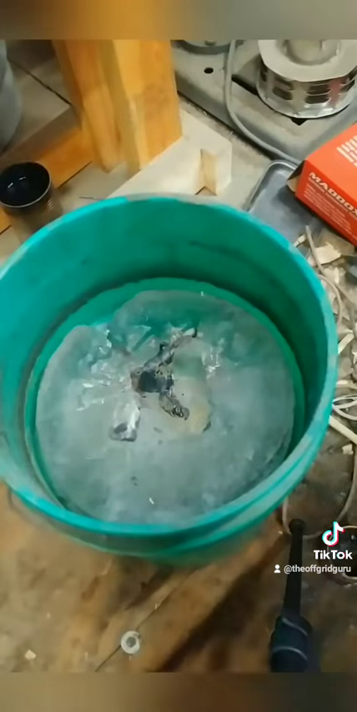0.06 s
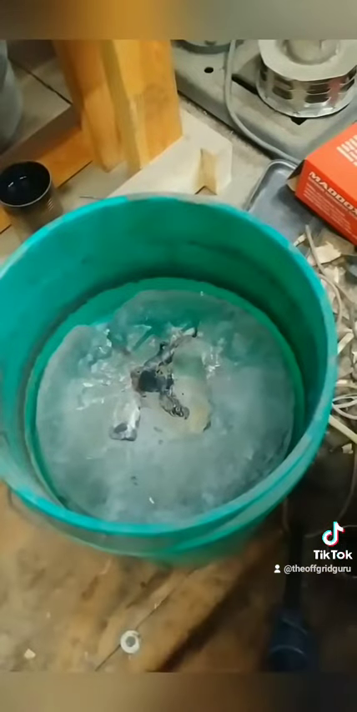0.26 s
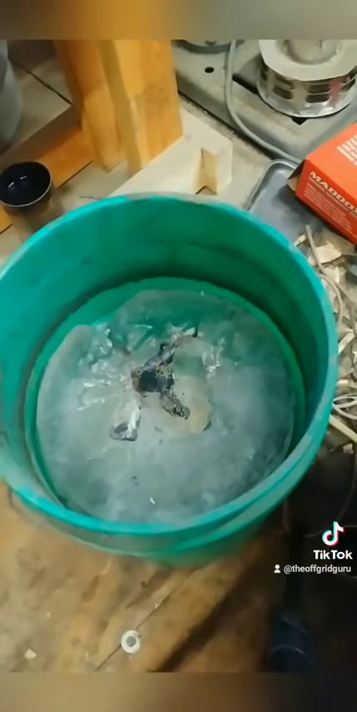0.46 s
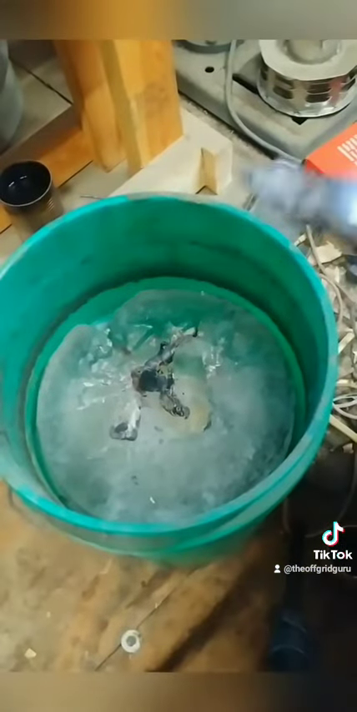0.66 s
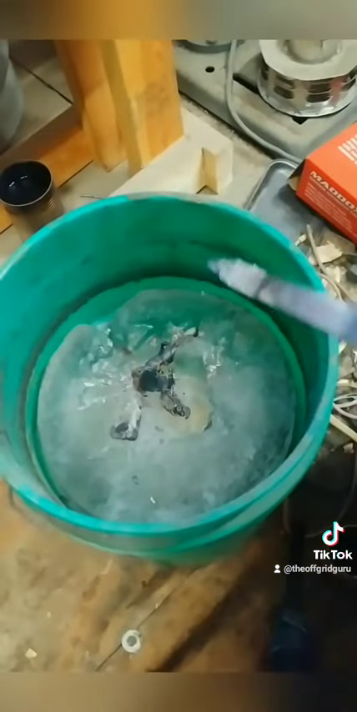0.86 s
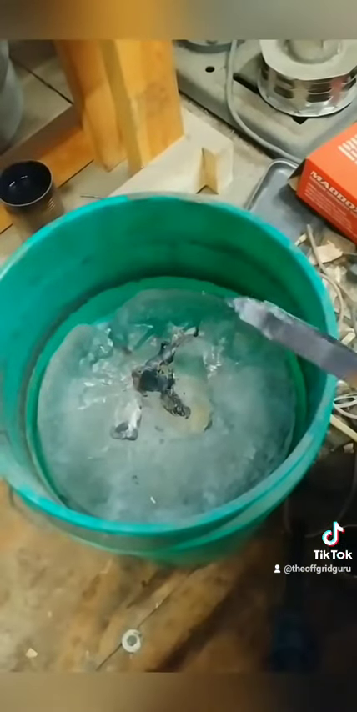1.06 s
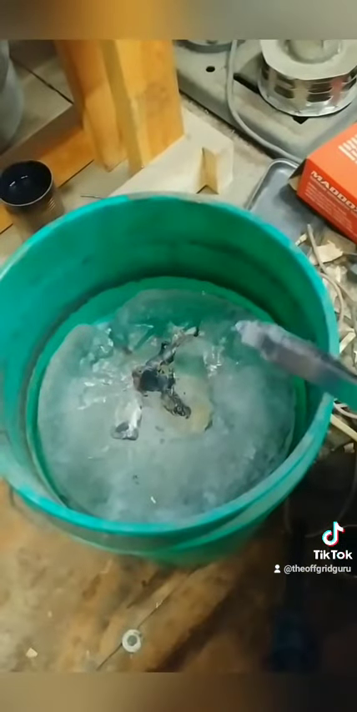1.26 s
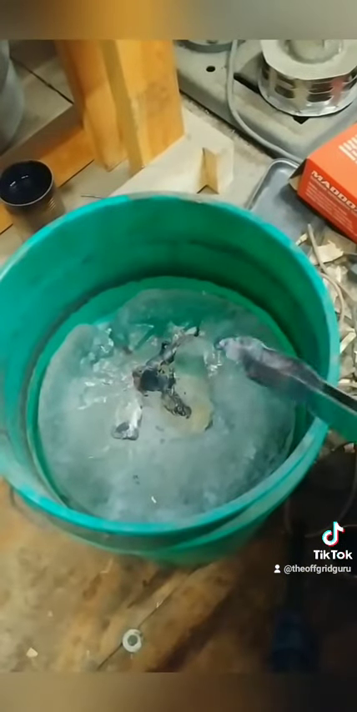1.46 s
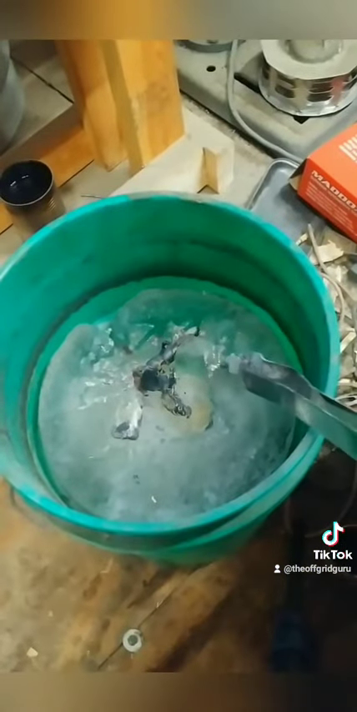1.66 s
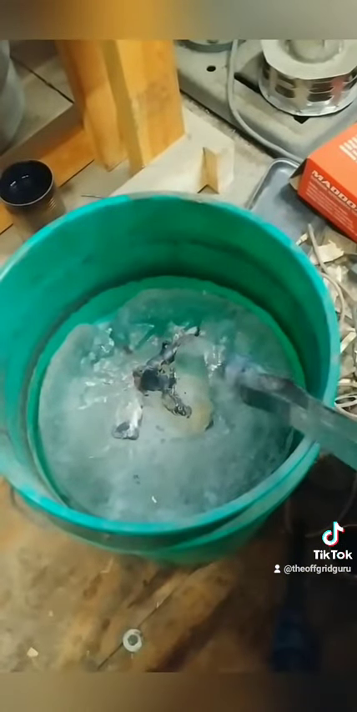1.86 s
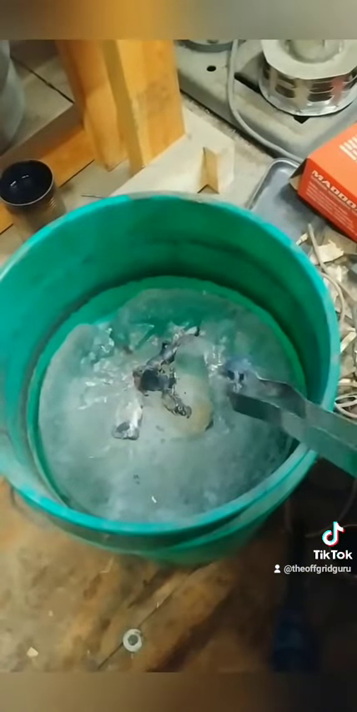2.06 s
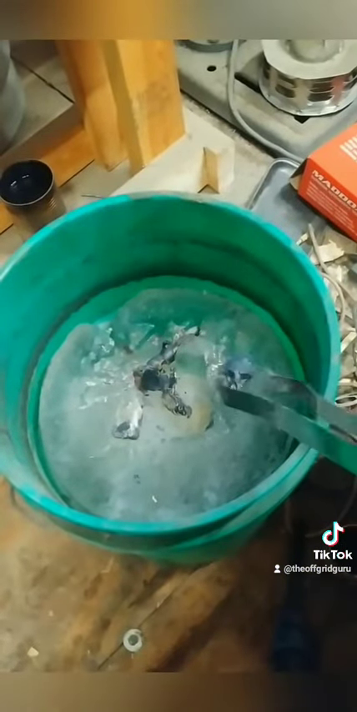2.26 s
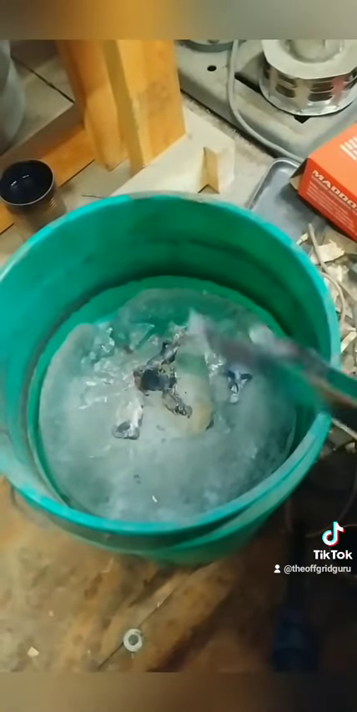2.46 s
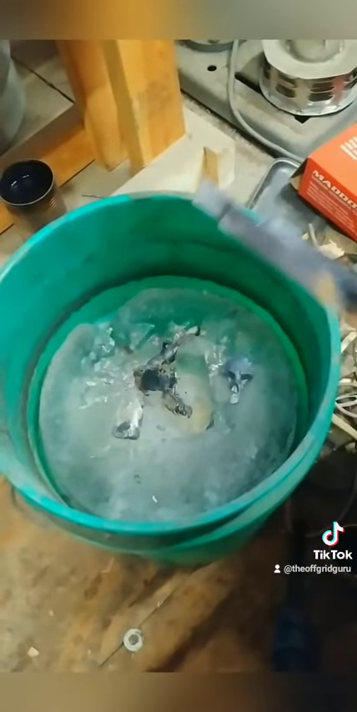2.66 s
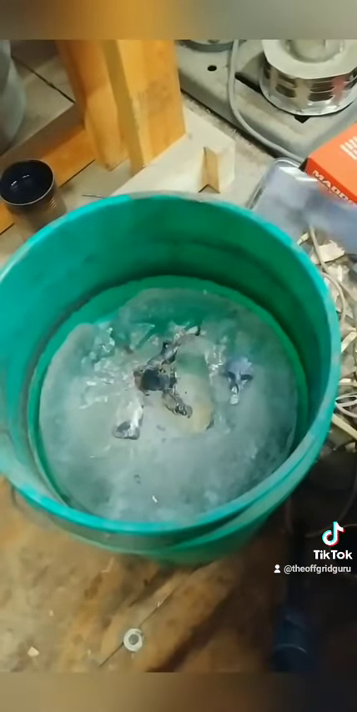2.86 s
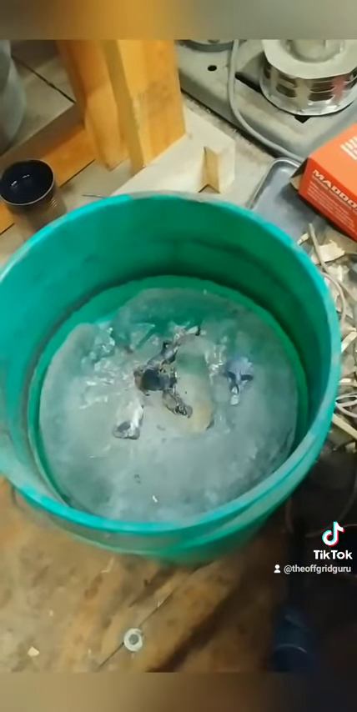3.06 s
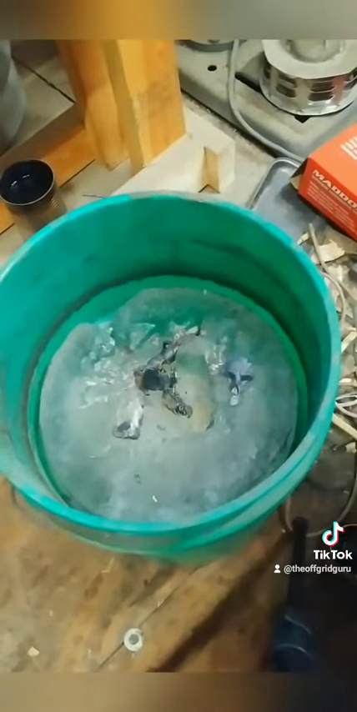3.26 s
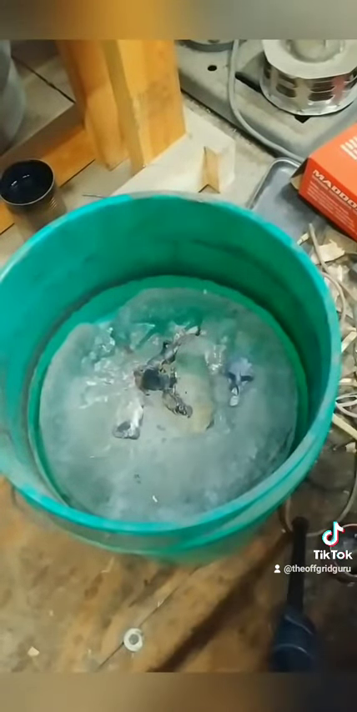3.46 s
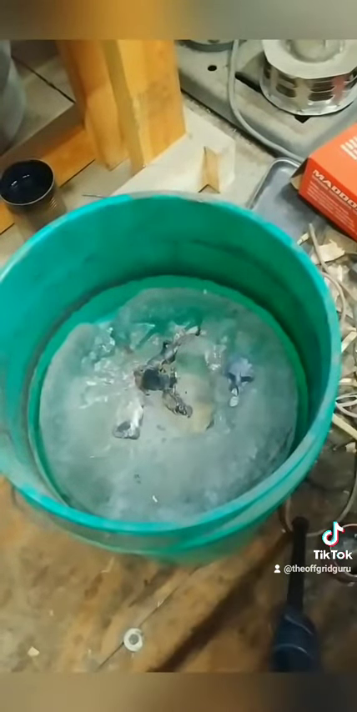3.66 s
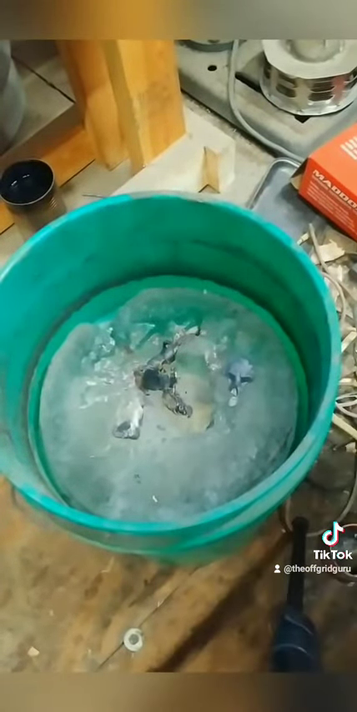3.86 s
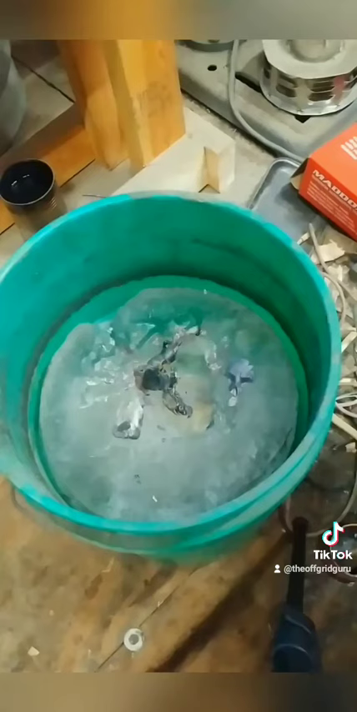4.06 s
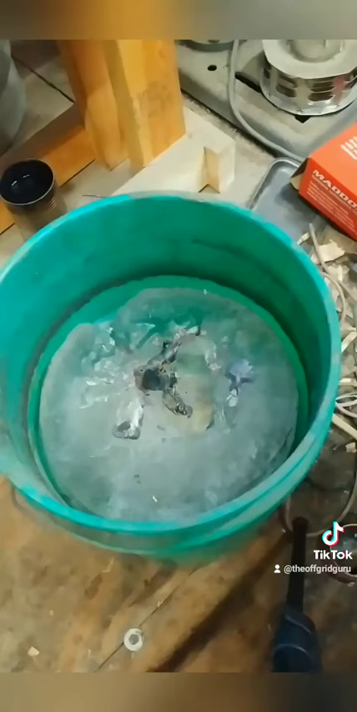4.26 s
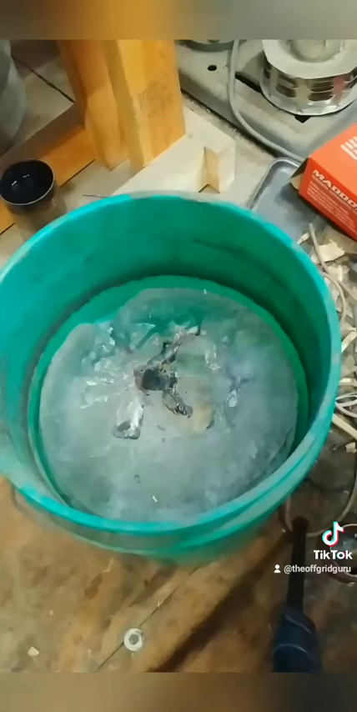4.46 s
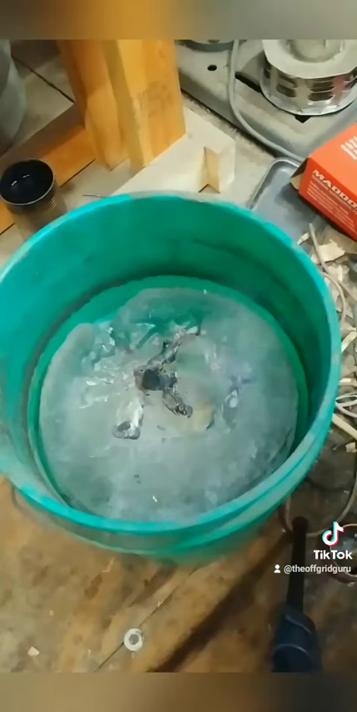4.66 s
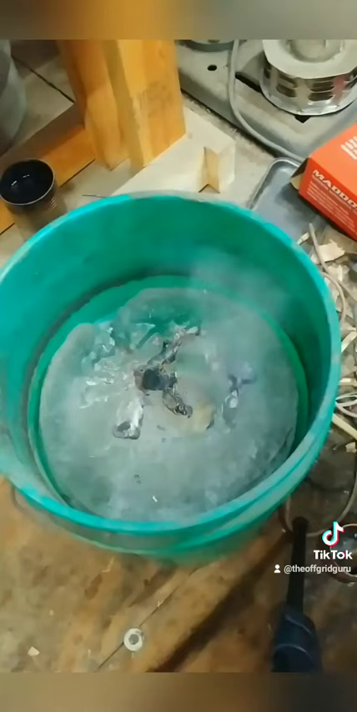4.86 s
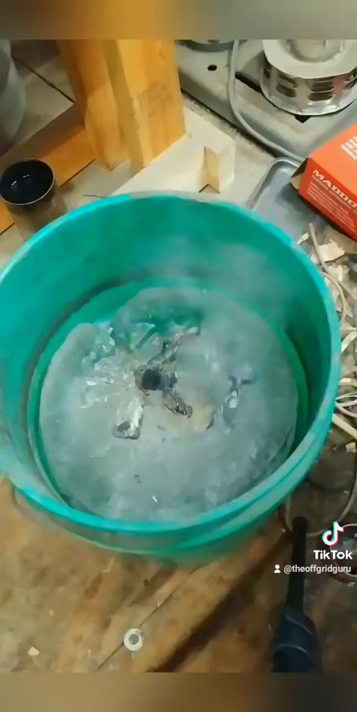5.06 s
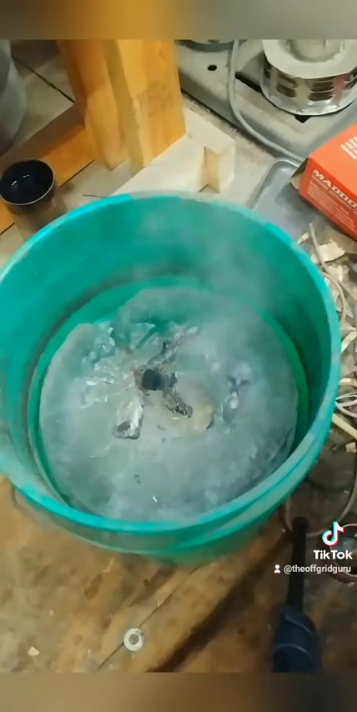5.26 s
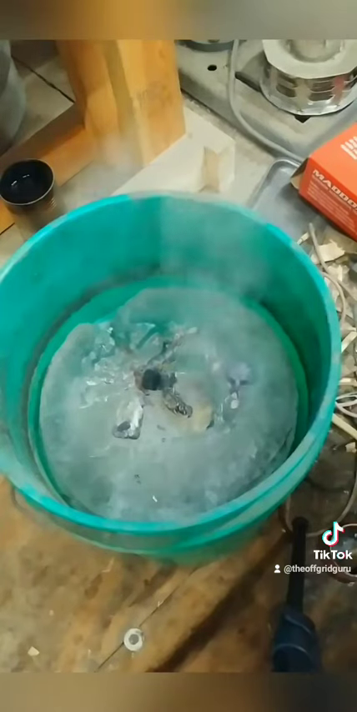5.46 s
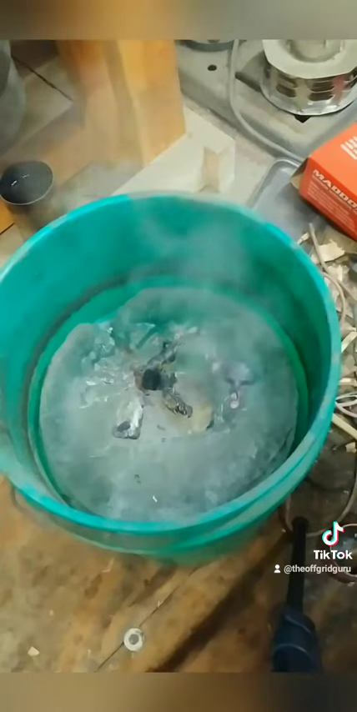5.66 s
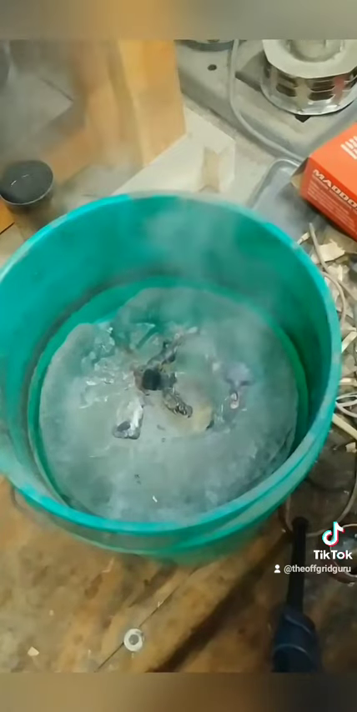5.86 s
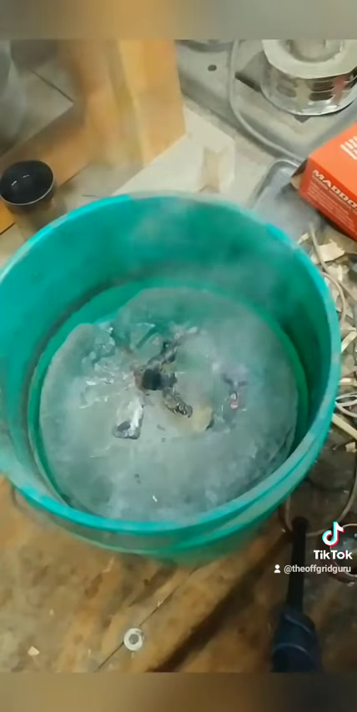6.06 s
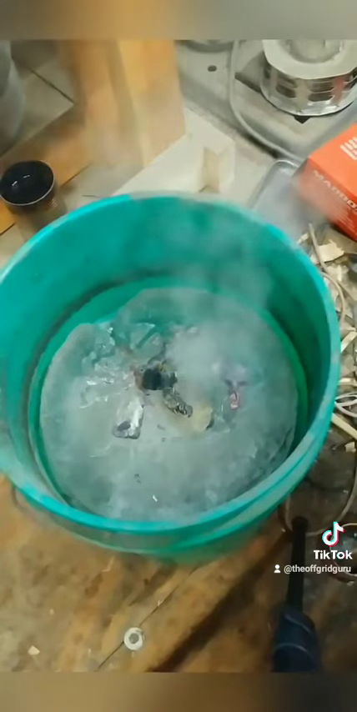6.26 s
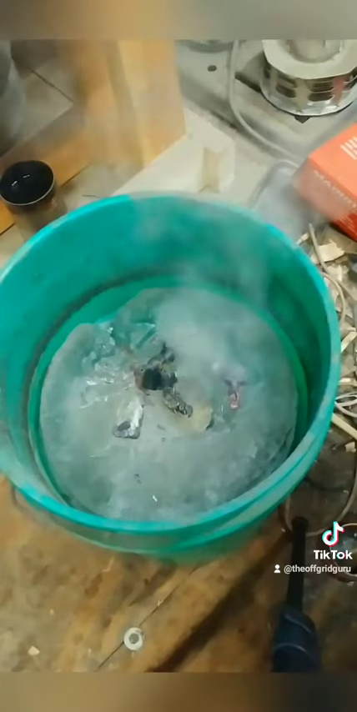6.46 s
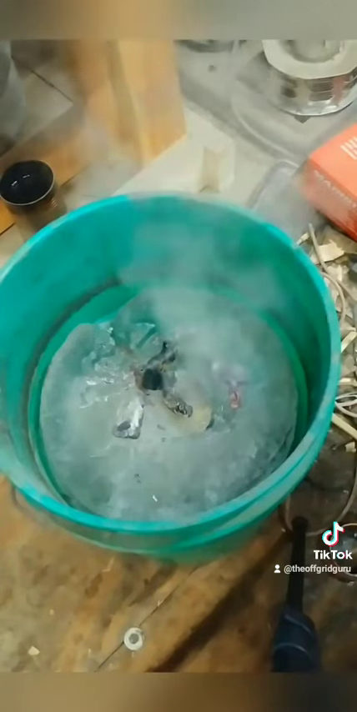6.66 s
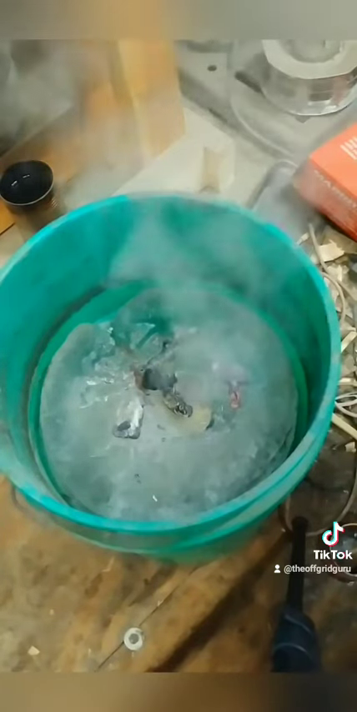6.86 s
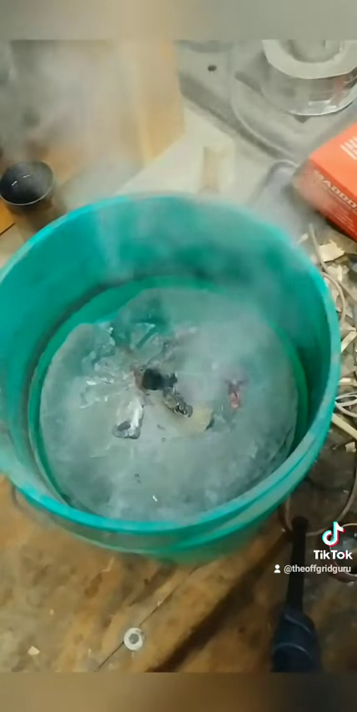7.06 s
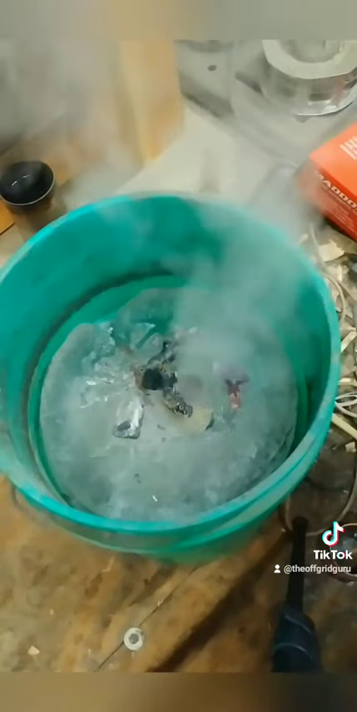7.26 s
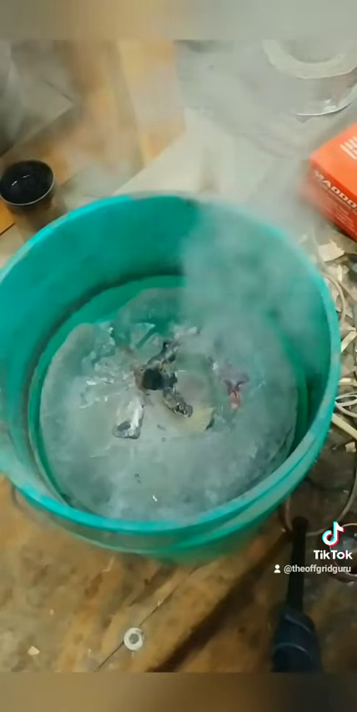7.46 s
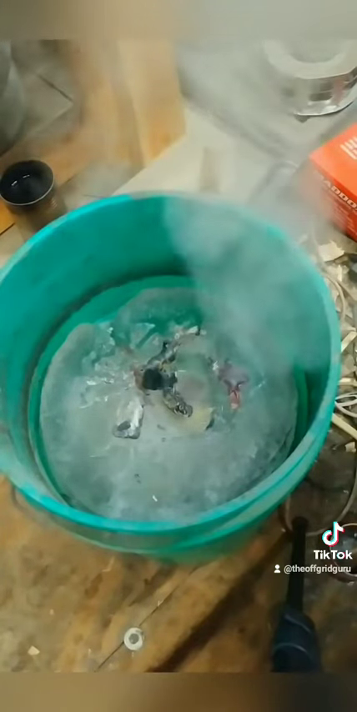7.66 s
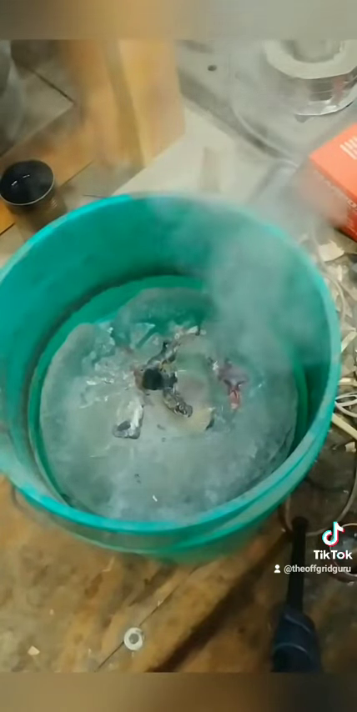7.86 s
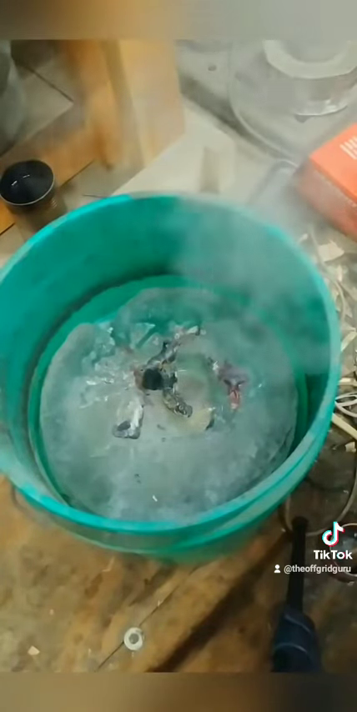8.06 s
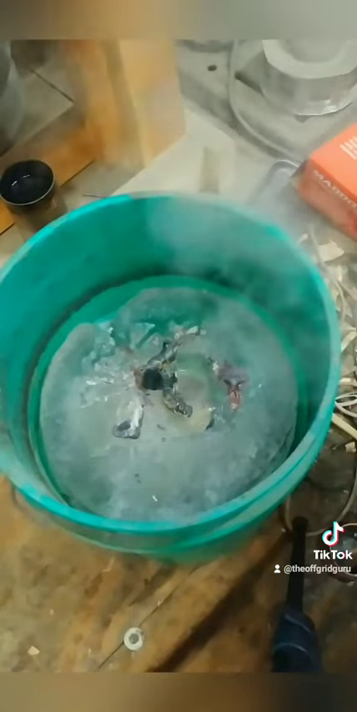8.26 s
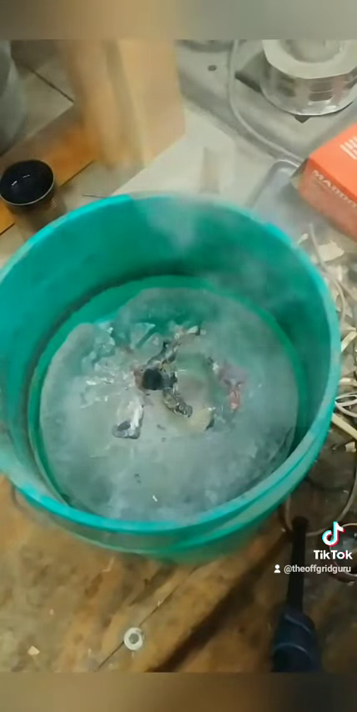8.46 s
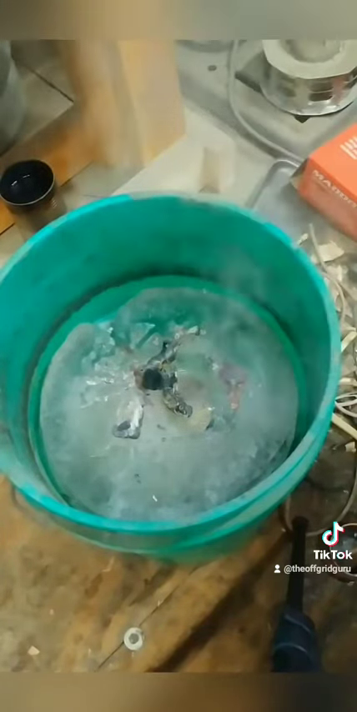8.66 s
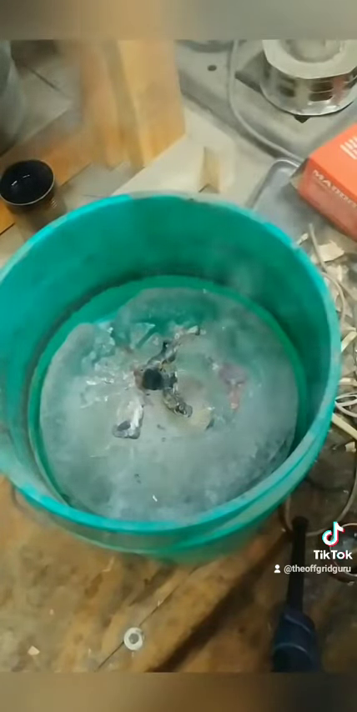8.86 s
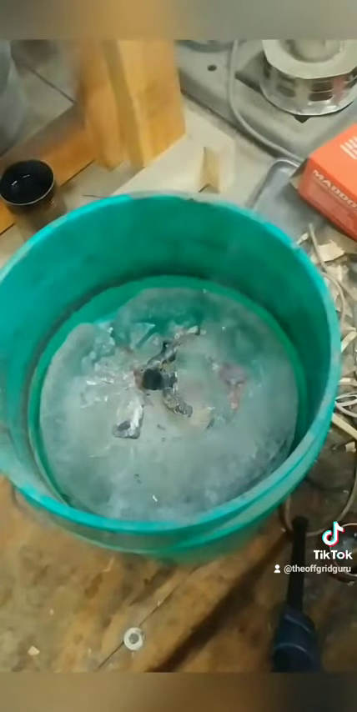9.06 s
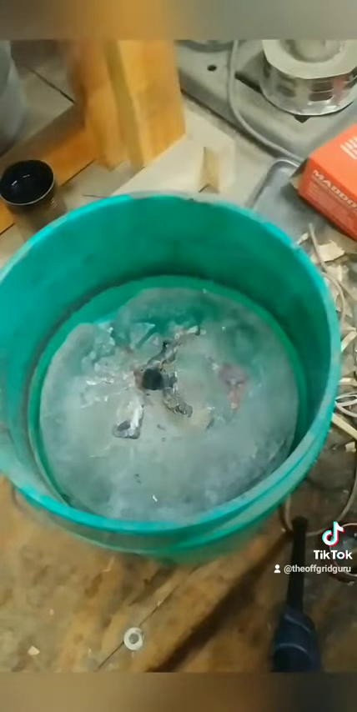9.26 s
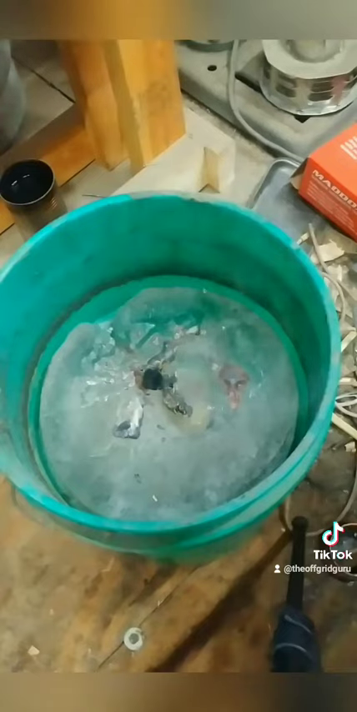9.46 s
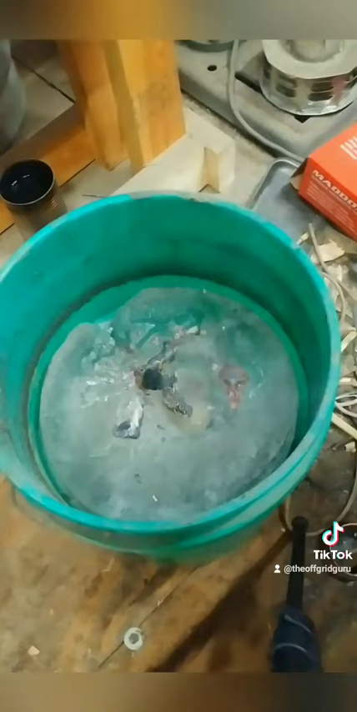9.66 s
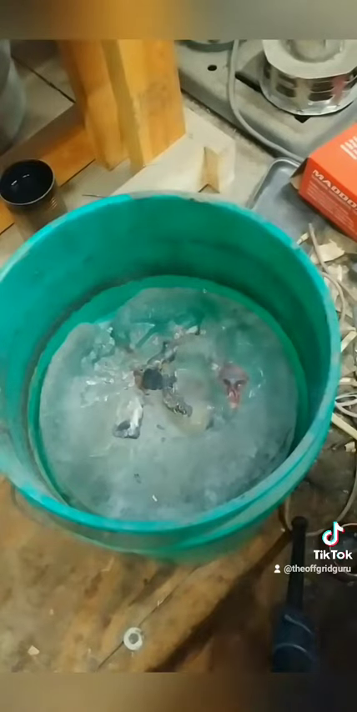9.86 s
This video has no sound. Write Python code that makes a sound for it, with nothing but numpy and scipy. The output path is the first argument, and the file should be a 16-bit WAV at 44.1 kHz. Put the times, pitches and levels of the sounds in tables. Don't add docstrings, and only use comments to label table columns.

```python
import sys
import numpy as np
from scipy import signal
from scipy.fft import rfft, irfft, next_fast_len
from scipy.io import wavfile
from scipy.ndimage import uniform_filter1d, minimum_filter1d

SR = 44100
rng = np.random.default_rng(int(sys.argv[2]) if len(sys.argv) > 2 else 0)


def to_wav(s):
    ch = np.atleast_2d(s).T
    pcm = np.round(np.clip(ch, -1, 1) * 32767)
    wavfile.write(sys.argv[1], SR, pcm.astype(np.int16))


def invert_db(level):
    return 10 ** (np.asarray(level, dtype=float) / 20)


N = 436590

# f/Hz, width/Hz,
# boost/dB
BUCKET_AIR = [(390.3, 106, 24.5), (718, 80, 9), (825, 89, 5.5), (1001, 67, 10.5), (1249, 39, 16),
              (1590, 21, 10), (1817, 28, 7.5), (2058, 11.4, -9), (2240, 158, 13.5), (2470, 104, 4.5),
              (3048, 240, 13.5), (3434, 62, 7.5), (3675, 60, 10.5), (3990, 94, 10.5), (4705, 550, 10),
              (4850, 40, -0.5), (5480, 50, 7), (5220, 50, 7.5), (5950, 40, 3.5), (6000, 80, -1.5),
              (6364, 24, 3.5), (6850, 155.5, -8.5), (8220, 79, 5), (8540, 170, 5), (10280, 220, -0.5),
              (10060, 1020, 17), (10980, 340, 5), (12780, 300, 3.5), (13880, 1200, -2.5), (15250, 720, 9)]
# f/Hz, width/Hz, boost/dB
MIC_PORT = [(6220, 800, 11.5), (6600, 710, 7)]
# t/s, jet level/dB, sputter depth/dB
STEAM_FORCE = [(1.95, -58, 0), (2.05, -40, .5), (2.2, -32, .5), (2.45, -29.5, .5), (2.87, -32, .5),
               (3.12, -30, .7), (3.4, -31, 2), (3.9, -33, 2.2), (4.1, -30, 1.5), (4.6, -25, 1.8),
               (5.0, -21.5, 1.8), (5.5, -17, .8), (6.05, -13.5, .8), (6.68, -13.5, 1), (6.86, -13.5, .6),
               (6.89, -18.5, .3), (7.25, -32, .2), (7.7, -68, 0)]


def rms_one(x):
    return x / np.sqrt(np.mean(x ** 2) + 1e-20)


def band(x, low_hz, high_hz, order=2):
    sos = signal.butter(order, [low_hz, high_hz], "band", fs=SR, output="sos")
    return signal.sosfilt(sos, x + 1e-18)


def peaks(x, resonances):
    for hz, width_hz, boost_db in resonances:
        r = np.exp(-np.pi * width_hz / SR)
        poles = [1, -2 * r * np.cos(2 * np.pi * hz / SR), r * r]
        resonance = signal.lfilter([(1 - r * r) / 2, 0, (r * r - 1) / 2], poles, x)
        x = x + (invert_db(boost_db) - 1) * resonance
    return x


def as_heard(x):
    return x / np.sqrt(np.mean(peaks(x, MIC_PORT) ** 2) + 1e-20)


def drift(rate):
    r = np.exp(-40 * np.pi * rate / SR)
    white = rng.standard_normal(N // 20 + 4002)
    slow = signal.lfilter([1], [1, -2 * r, r * r], white)[4000:]
    return np.interp(np.arange(N) / 20, np.arange(len(slow)), rms_one(slow))


def ring(clicks, modes):
    out = 0
    for hz, level_db, t60 in modes:
        r = invert_db(-60 / (np.clip(t60, .01, .4) * SR))
        w = 2 * np.pi * hz / SR
        poles = [1, -2 * r * np.cos(w), r * r]
        out = out + signal.lfilter([0, invert_db(level_db) * np.sin(w)], poles, clicks + 1e-18)
    return out


def envelope(times, levels_db, t60s, rises):
    out = np.zeros(N)
    for s, level_db, t60, rise in np.broadcast(times, levels_db, t60s, rises):
        at = np.arange(max(0, round((s - .1) * SR)), min(N, round((s + .5) * SR)))
        t = at / SR - s
        fall = np.where(t > 0, t / max(t60, .002), -t / max(rise, .0003))
        out[at] += invert_db(level_db - 60 * fall)
    return out


def crackle(per_s, spread_db):
    sizes = invert_db(spread_db * np.minimum(rng.exponential(1, N), 5))
    signed = sizes * rng.choice([-1, 1], N)
    return rms_one(signed * (rng.random(N) < per_s / SR))


def burst_noise(s, mid_db, low_db, bright_db, t60, rise, edges_hz, body):
    white = peaks(rng.standard_normal(N), body)
    out = 0
    for k, (level_db, lasting) in enumerate([(low_db, 1.1), (0, 1), (bright_db, .7)]):
        low_hz, high_hz = edges_hz[k], edges_hz[k + 1]
        colour = as_heard(band(white, low_hz, high_hz))
        burst = colour * envelope(s, mid_db + level_db, t60 * lasting, rise)
        out = out + band(burst, 0.9 * low_hz, 1.4 * high_hz, order=1)
    return out


def in_time(rows):
    s, *levels = np.transpose(rows)
    return [np.interp(np.arange(N) / SR, s, c, left=-120, right=-120) for c in levels]


def by_stage():
    stages = [
        (1.95, -9.5, -52, -51, -51),
        (3.35, -13, -51, -50, -52.5),
        (3.9, -15, -58, -63, -55.5),
        (4.469, -10.5, -39, -28, -42),
        (4.63, -12, -39, -32, -36),
        (5.268, -13.5, -44.5, -45.5, -46),
        (5.9, -11.5, -42.5, -42.5, -43.5),
        (7.0, -9.5, -39.5, -37.5, -40),
    ]
    change_s = .03
    s, *levels = np.transpose(stages)
    now = np.clip(np.searchsorted(s, np.arange(N) / SR) - 1, 0, len(s) - 1)
    return [uniform_filter1d(c[now], size=round(change_s * SR)) for c in levels]


def room_tone():
    # multiple of the hum, level/dB rms
    harmonics = [(1, -63), (2, -65.5), (3, -70.5), (4, -70.5), (5, -63), (6, -70), (10, -69.5), (14, -77),
                 (15, -72), (16, -74.5)]
    # f/Hz, level/dB per Hz
    air_spectrum = [(40, -118), (100, -99.5), (200, -93.5), (400, -94), (650, -81.5), (800, -88.5), (1000, -93),
                    (2000, -93.5),
                    (3200, -99), (5000, -100), (6400, -95), (8000, -109), (10000, -118), (16000, -128)]
    hum_hz = 137
    phase = 2 * np.pi * np.cumsum(hum_hz * (1 + 0.001 * drift(0.499))) / SR
    hum = 0
    for k, level_db in harmonics:
        hum = hum + np.sqrt(2) * invert_db(level_db + .8 * drift(1.9)) * np.sin(k * phase + k * k)
    hz, level_db = np.transpose(air_spectrum)
    size = next_fast_len(N)
    log_hz = np.log(np.fft.rfftfreq(size, 1 / SR) + 1)
    colour = invert_db(np.interp(log_hz, np.log(hz), level_db))
    port = np.abs(rfft(peaks(np.arange(size) == 0, MIC_PORT)))
    air = irfft(rfft(rng.standard_normal(size)) * colour / port, size)[:N]
    return hum + np.sqrt(SR / 2) * invert_db(.6 * drift(3)) * air


def knocks():
    # t/s, body level/dB, low over it/dB, bright over it/dB, t60/s
    sharp = [(0.062, -45, 9.5, 0.5, 0.12), (.077, -51.5, 12, -1, 0.17), (.11, -53, 3, -10, .11),
             (.164, -52, 17, -14, 0.079), (0.19, -52, 7, -2, .17), (.211, -40.5, -5, 2.5, 0.26),
             (0.42, -32, 8, -6.5, 0.21), (9.779, -34.5, -22, -13, 0.039), (9.788, -44, -16, 2, .05),
             (9.82, -49, -5, 1, 0.06), (9.849, -54, 15, -5, 0.11), (9.863, -63, 15, 2, .11)]
    # t/s, body level/dB, low over it/dB, t60/s
    scuffs = [
        (.35, -48, -2, 0.44),
        (.445, -33.5, -11, 0.53),
    ]
    # t/s, body level/dB, bright over it/dB, t60/s, rise/s
    shuffle_events = [
        (7.985, -44, -3, 0.16, 0.29),
        (9.31, -47, -2, 0.18, 0.013),
        (9.737, -43, 10, 0.12, .061),
        (9.9, -42, -7, .1, .03),
    ]
    # f/Hz, level/dB, t60/s
    tool_modes = [(6013, -14, .12), (6850, -8, .08), (7300, -8, .14), (8333, 0, .3), (10060, 0, .1)]
    # f/Hz, width/Hz, boost/dB
    wood = [(141, 65, 11.7), (373, 25, 2.5), (746, 110, 9.1), (856, 80, 2.7), (1230, 15, 2.9),
            (1500, 29, 1.4), (2000, 36, 2.9), (2470, 69, 4.7), (3900, 830, 15)]
    knock_rise_s, scuff_rise_s, scuff_bright_db = 0.0039, 0.086, -0.5
    contacts = [(*row, knock_rise_s) for row in sharp]
    for s, body_db, low_db, t60 in scuffs:
        contacts.append((s, body_db, low_db, scuff_bright_db, t60, scuff_rise_s))
    blows = burst_noise(*np.transpose(contacts), (75, 480, 1900, 7000), wood)
    s, body_db, bright_db, t60, rise = np.transpose(shuffle_events)
    low_db = 0 - 0.37 * bright_db
    shuffles = burst_noise(s, body_db, low_db, bright_db, t60, rise, (190, 600, 3500, 9500), [])
    tool_s, tool_db = 9.731, -55
    click = np.zeros(N)
    click[round(tool_s * SR)] = invert_db(tool_db)
    return blows + shuffles + ring(click, tool_modes)


def ticks():
    # t/s, peak level/dB
    tick_events = [(.070, -40), (.212, -47), (7.5894, -49), (7.8397, -40.5), (8.4594, -49), (8.648, -48),
                   (8.77, -52), (8.876, -49), (9.684, -60.5), (9.8544, -59)]
    s, peak_db = np.transpose(tick_events)
    dry_noise = as_heard(band(rng.standard_normal(N), 5200, 11300))
    return dry_noise * envelope(s, peak_db - 6.5, .012, 0.00078)


def tongs():
    # t/s, scrape level/dB, ring level/dB, bright over the scrape/dB, t60/s
    touches = [
        (1.748, -38, -37, 10, 0.059),
        (1.768, -45.5, -52, 14.5, 0.075),
        (1.812, -38.5, -62, 13.5, 0.042),
        (1.822, -54, -25.5, 18, 0.052),
        (1.855, -51, -58, 16.5, 0.067),
        (1.866, -54, -43, -3, .08),
        (1.91, -50, -42, -15, 0.073),
        (1.940, -42, -39, 12.5, 0.045),
    ]
    # f/Hz, level/dB, t60/s
    ice_modes = [(700, -3, .08), (851, 0, .08), (975, -6, .05), (1048, -6, .05), (1195, -5, .06),
                 (1410, -10, .05)]
    s, scrape_db, ring_db, bright_db, t60 = np.transpose(touches)
    steel = [(3530, 590, 12), (7640, 290, 4.9)]
    out = burst_noise(s, scrape_db, -0.42, bright_db, t60, 0.00042, (180, 650, 5700, 8800), steel)
    grit = as_heard(band(crackle(per_s=5000, spread_db=2.5), 700, 2700))
    out = out + grit * envelope(s, ring_db - 15, .35, .002)
    for mode in ice_modes:
        clicks = np.zeros(N)
        clicks[(s * SR).astype(int)] = invert_db(ring_db + rng.normal(0, 1.5, len(s)))
        out = out + ring(band(clicks, 550, 1700), [mode])
    return out


def steam():
    # t/s, peak level/dB
    spurt_events = [(3.3338, -19.5), (3.469, -29), (3.569, -18), (3.6057, -31), (3.7075, -25),
                    (3.7763, -25), (3.9305, -22), (4.471, -8), (4.4872, -9), (4.5984, -16), (4.6389, -16),
                    (4.6917, -23), (4.7651, -10), (4.805, -9), (4.951, -7), (5.0225, -13), (5.078, -14),
                    (5.1347, -13), (5.1612, -7.5), (5.3373, -15.5), (5.474, -6.5), (5.7673, -4),
                    (5.917, -10), (5.9898, -10), (6.09, -12.5), (6.345, -8), (6.432, -6.5), (6.5166, -7.5),
                    (6.6894, -4), (6.781, -4)]
    t = np.arange(N) / SR
    jet_db, sputter_db = in_time(STEAM_FORCE)
    spray_db = jet_db + by_stage()[0]
    fizz_db = jet_db - 11 - 0.7 * (t - STEAM_FORCE[0][0])
    fizz_db = fizz_db - 8 * np.maximum(t - 6.6, 0)
    shake = band(drift(30), 9.5, 200, order=1) * 1.2 + 0.88 * drift(120)
    flutter = np.clip(sputter_db, 0, 5) * shake
    bursts = peaks(crackle(per_s=16000, spread_db=2.0), BUCKET_AIR)
    s, peak_db = np.transpose(spurt_events)
    rise_s, t60_s = .003, .03
    spurt = envelope(s, peak_db - 10, .6 * t60_s, rise_s)
    spurt = -minimum_filter1d(-spurt, size=240, origin=115)
    jet_level = invert_db(jet_db + flutter) + spurt
    spray_level = invert_db(spray_db + 1.0 * flutter + 0.78 * drift(4.8)) + invert_db(-23) * spurt
    fizz_level = invert_db(fizz_db + 0.81 * flutter + 0.52 * drift(5.3)) + invert_db(-22) * spurt
    jet = jet_level * as_heard(band(bursts, 5860, 7500, order=3))
    spray = spray_level * as_heard(band(bursts, 2040, 5600))
    fizz = fizz_level * as_heard(band(bursts, 8870, 14500))
    return jet + spray + fizz


def melt_pool():
    gulp_db, gulps_per_s = 1.6, 18
    boil_db = 0.77 * (in_time(STEAM_FORCE)[0] + 20)
    levels = [boil_db + c + gulp_db * drift(gulps_per_s) for c in by_stage()[1:]]
    deep_db, hollow_db, narrow_db = levels
    gulps = peaks(crackle(per_s=3300, spread_db=1.0) * invert_db(0.53 * drift(25)), BUCKET_AIR)
    deep = invert_db(deep_db + 0.34) * rms_one(band(gulps, 200, 600))
    hollow = invert_db(hollow_db - 1.1) * rms_one(band(gulps, 664, 1200))
    narrow = invert_db(narrow_db + 2.2) * rms_one(band(gulps, 1080, 2000))
    rumble = invert_db(deep_db - 11) * rms_one(band(gulps, 96, 260))
    return deep + hollow + narrow + rumble


def pops():
    # t/s, peak level/dB, low thump/dB, bright/dB
    pocket_bursts = [(3.4695, -36, -11, -1), (3.538, -24, -12, 1), (3.605, -30, -10, -3),
                     (3.6473, -21, -13, -3), (3.7093, -25.5, -11, -9), (3.7549, -29, -13, -3),
                     (3.775, -28, -10, 3), (3.8045, -28.5, -21, -5), (3.85, -26, -20.5, -3),
                     (4.4707, -20.5, -4, -3), (4.4887, -19, -3, -2), (4.531, -24, -16, 3),
                     (4.5815, -27, -15, -5), (4.5984, -18, -4, -6), (4.6377, -19, -16, 4),
                     (4.6607, -28, -13, 3), (4.7073, -18, -7, 1), (4.744, -23, -13, -3),
                     (4.7662, -20.5, -16, 9.5), (4.8045, -18.5, -9, 0), (4.8268, -23, -4.5, -3),
                     (4.8766, -17, 0, -6), (4.9165, -19, -14, -8), (5.002, -24, -13, -6),
                     (5.044, -14.5, -13, -7), (5.066, -18, -8, -7), (5.0783, -18, -14.5, 1.5),
                     (5.233, -29, -10.5, -4), (5.468, -25, -6.5, 0), (6.091, -20, -12.5, -3)]
    s, peak_db, low_db, bright_db = np.transpose(pocket_bursts)
    t60 = .03 * (1 + 1.5 * invert_db(low_db))
    edges_hz = (500, 1100, 3500, 9000)
    return burst_noise(s, peak_db - 3.0, low_db, bright_db, t60, 0.00034, edges_hz, BUCKET_AIR)


def spits():
    from_s, to_s, level_db = 4.47, 5.27, -37.5
    t = np.arange(N) / SR
    cracks = peaks(crackle(per_s=120, spread_db=3.0), BUCKET_AIR)
    cracks = as_heard(band(cracks, 450, 4800))
    return invert_db(level_db) * cracks * ((t > from_s) & (t < to_s))


def shop(x):
    t60_s, gap_s = .35, .006
    t = np.arange(round(.6 * SR)) / SR
    tail = band(rng.standard_normal(len(t)), 100, 5700, order=1)
    tail = tail * invert_db(-60 * t / t60_s) * (t > gap_s)
    return signal.fftconvolve(x, tail / np.sqrt(np.sum(tail ** 2)))[:N]


def scene():
    near = knocks() + ticks() + tongs() + steam() + melt_pool() + pops() + spits()
    echo_db = -12
    return (near + invert_db(echo_db) * shop(near) + room_tone())[None]


def band_limit(x):
    return signal.sosfilt(signal.butter(12, 16360, fs=SR, output="sos"), x)


def record(dry):
    low_cut = signal.butter(2, 75, "high", fs=SR, output="sos")
    top_cut = signal.ellip(10, .5, 50, 15450, fs=SR, output="sos")
    heard = signal.sosfilt(low_cut, peaks(dry, MIC_PORT))
    rounded = .85 * np.tanh(heard / .85)
    mix = signal.sosfilt(top_cut, rounded)
    return band_limit(mix)


dry = scene()
out = record(dry)
to_wav(out)
```